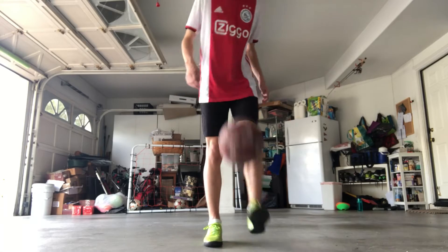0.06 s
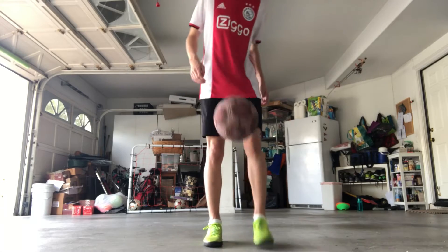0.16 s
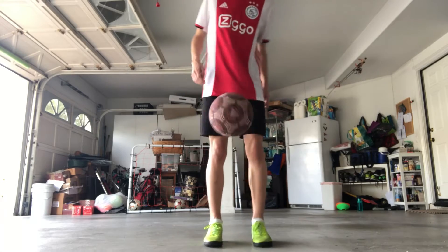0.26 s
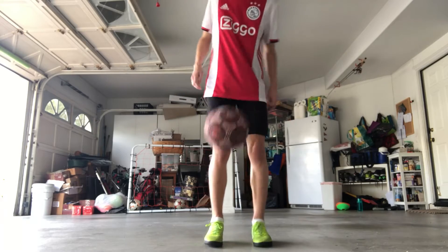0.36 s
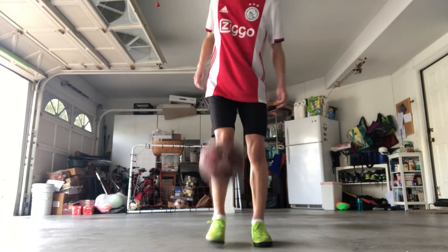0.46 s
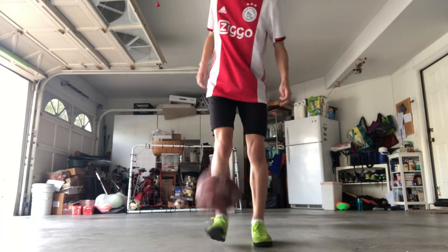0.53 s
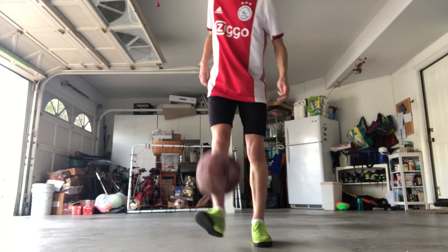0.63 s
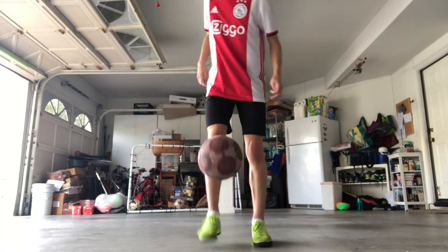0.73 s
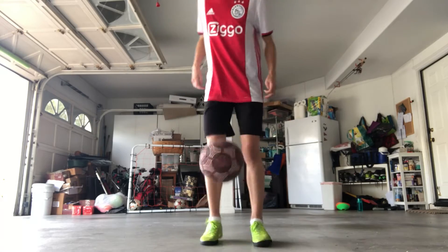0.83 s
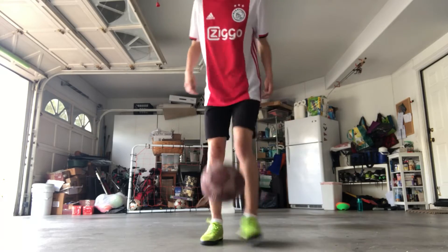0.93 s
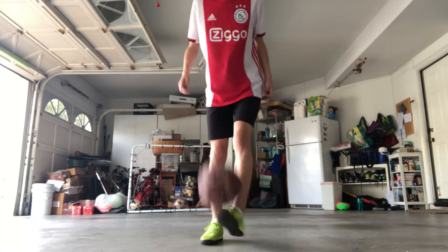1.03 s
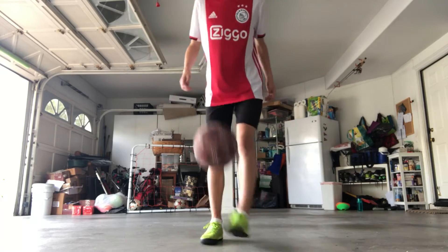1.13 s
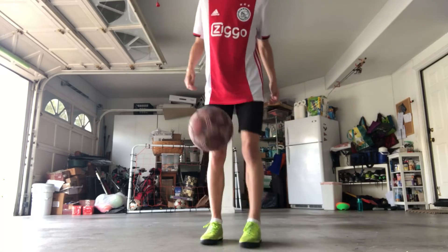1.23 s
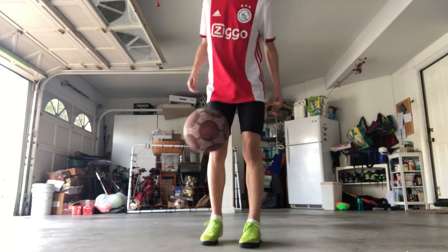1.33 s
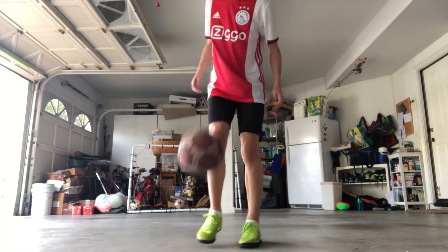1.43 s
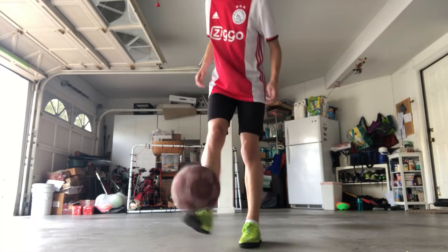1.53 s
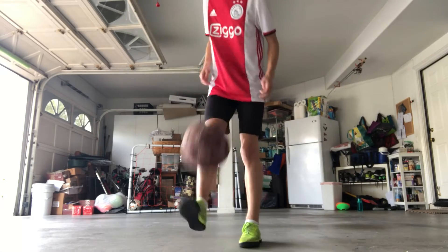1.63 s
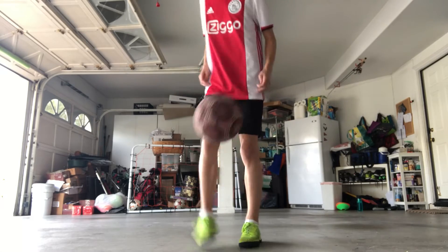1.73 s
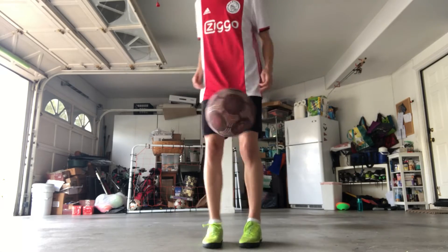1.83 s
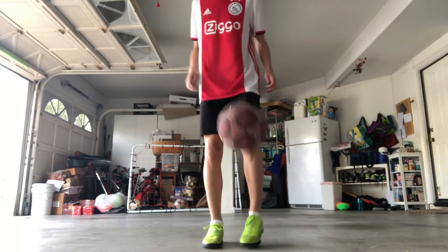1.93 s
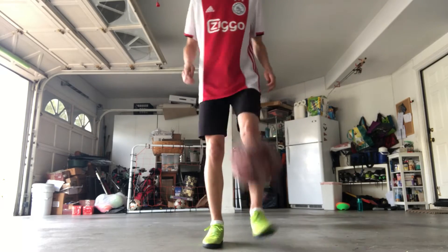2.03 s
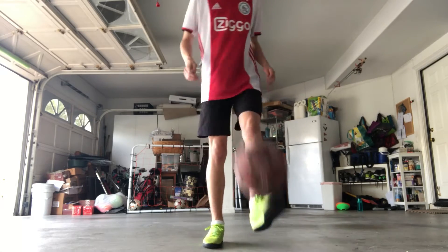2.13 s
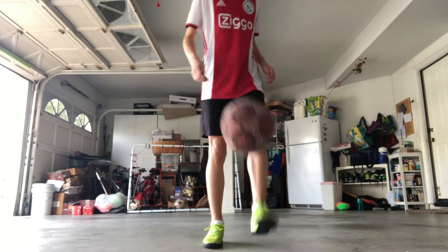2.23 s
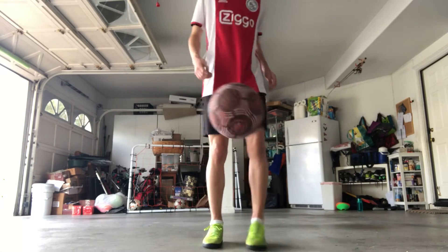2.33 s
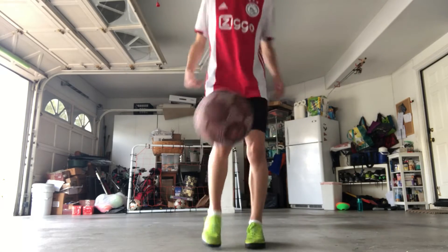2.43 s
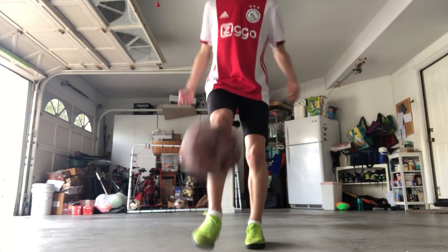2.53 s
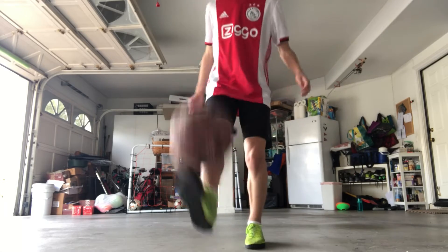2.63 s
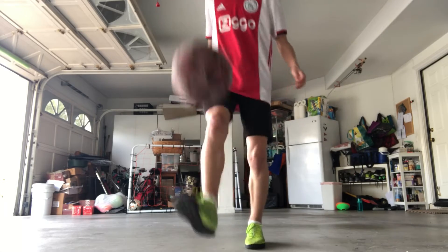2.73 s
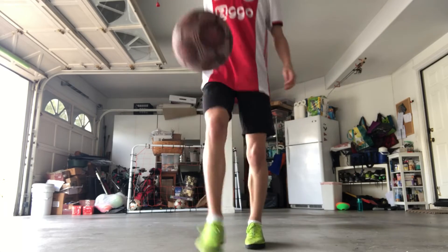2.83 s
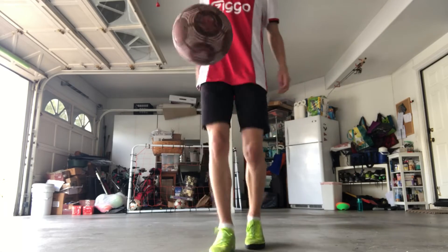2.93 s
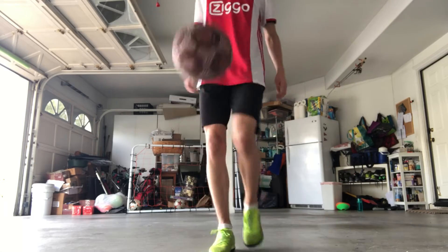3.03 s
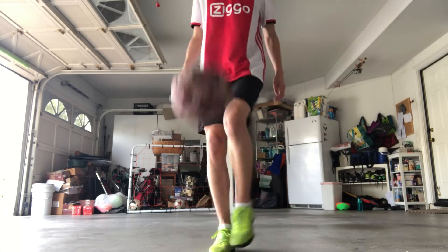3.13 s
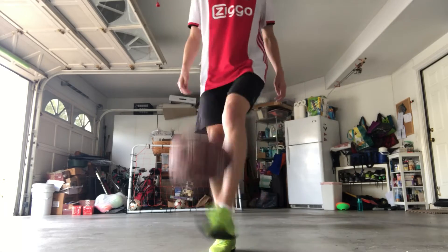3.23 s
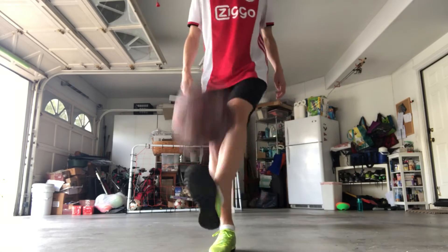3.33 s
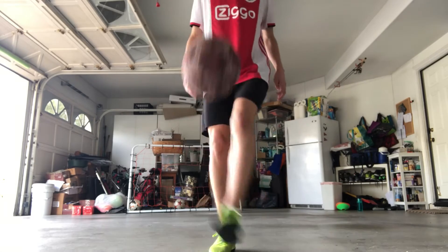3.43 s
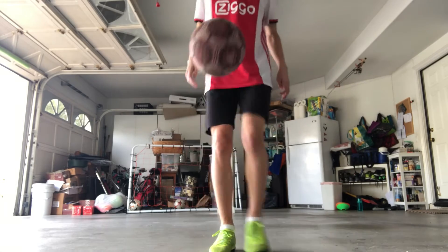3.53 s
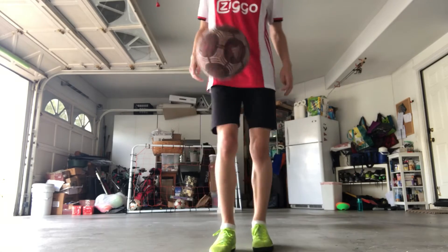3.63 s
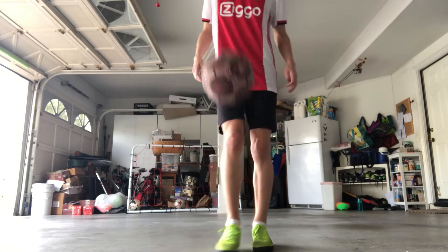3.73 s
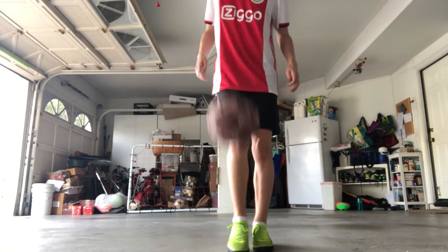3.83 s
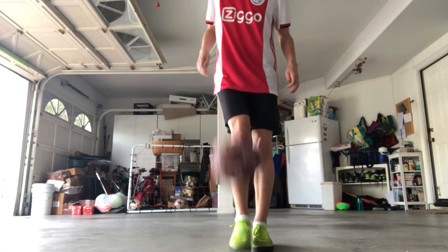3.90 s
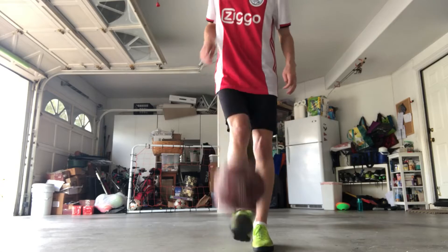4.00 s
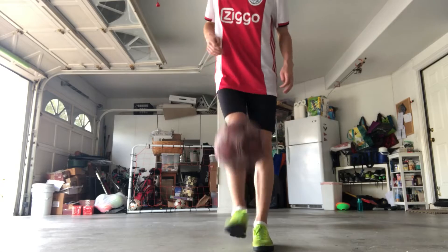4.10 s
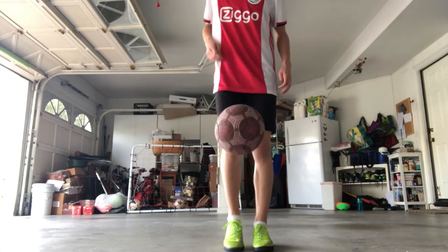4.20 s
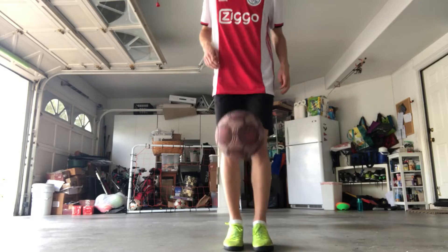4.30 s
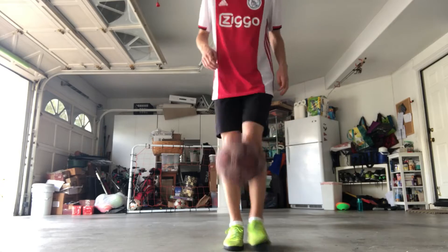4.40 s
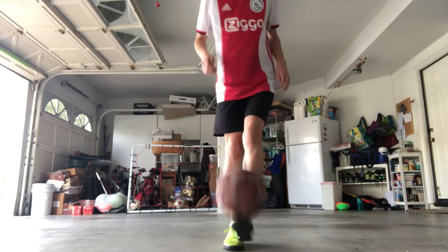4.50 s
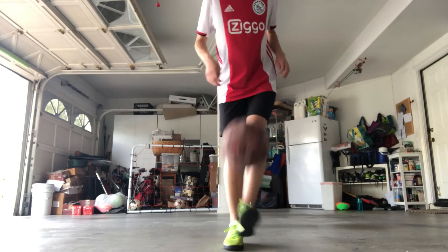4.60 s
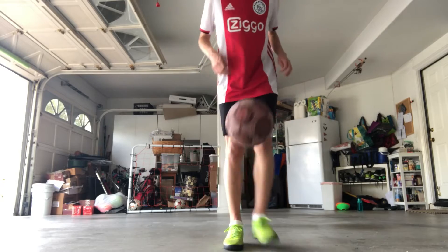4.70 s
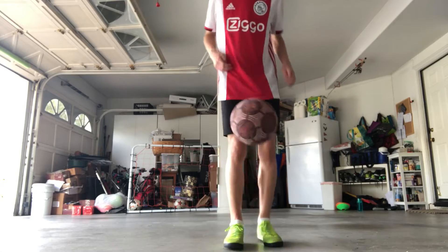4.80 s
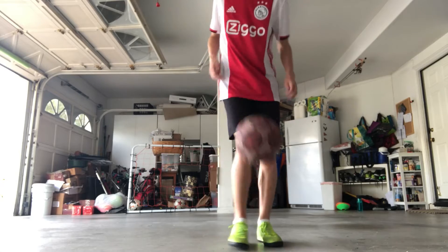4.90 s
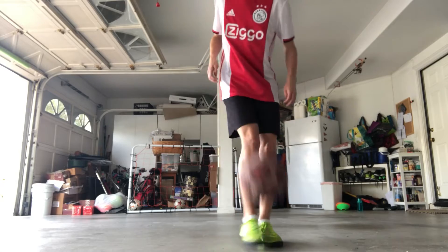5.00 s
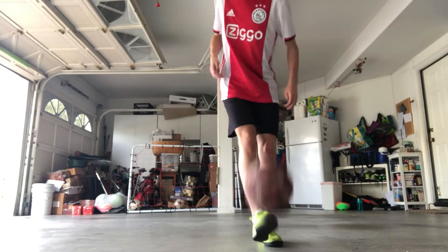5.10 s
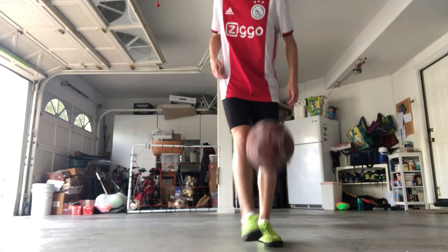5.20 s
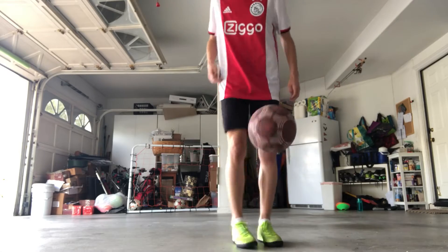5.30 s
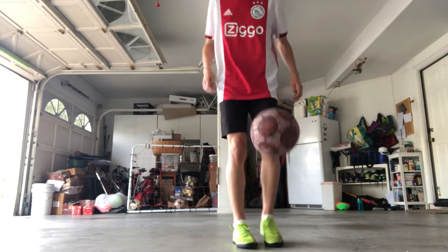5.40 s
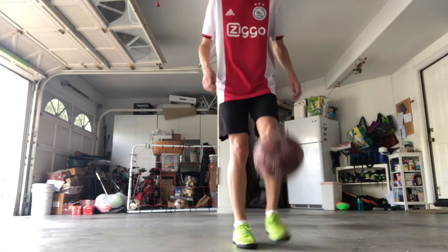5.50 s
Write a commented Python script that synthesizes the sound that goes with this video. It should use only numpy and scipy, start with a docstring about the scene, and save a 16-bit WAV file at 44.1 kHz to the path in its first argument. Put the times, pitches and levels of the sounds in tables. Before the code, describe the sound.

A soccer ball is juggled in a bare garage, with hollow thumps alternating with sharp shoe slaps and gritty scuffs on concrete.

```python
"""Juggling a ball in a garage

A player juggles a soccer ball close to a phone on the concrete floor. Each kick is a push-pull thump with damped
casing and air modes and a leather crack; between kicks the shoe slaps down and its sole scuffs on grit as shaped noise.
Bare walls add echoes and a diffuse tail of about half a second; a motor hums and whines faintly over filtered hiss."""
import sys
import numpy as np
from scipy.fft import rfft, irfft, next_fast_len
from scipy.io import wavfile
from scipy.ndimage import uniform_filter1d, map_coordinates

SR = 44100
rng = np.random.default_rng(int(sys.argv[2]) if len(sys.argv) > 2 else 0)


def dump_mix(stems):
    """Bounce the given channels to the path in sys.argv[1] as a 16-bit WAV at rate SR."""
    frames = np.atleast_2d(stems).T  # one column per channel
    limited = np.clip(frames, -1, 1)  # hard clip at full scale
    pcm = np.round(limited * 32767).astype(np.int16)
    wavfile.write(sys.argv[1], SR, pcm)


N = 244733
LEAD = 4410  # samples ahead of time zero, for the kick that starts there


def amp(db):
    """Amplitude ratio of a level in dB."""
    return 10 ** (np.asarray(db) / 20)


def unit(x):
    """x scaled to an RMS of 1."""
    return x / np.sqrt(np.mean(x ** 2) + 1e-20)


def filtered(x, response):
    """x times a complex response of frequency."""
    m = next_fast_len(len(x) + SR // 4)
    freq_hz = np.fft.rfftfreq(m, 1 / SR) + 1  # +1 keeps logs and divisions finite
    return irfft(rfft(x, m) * response(freq_hz), m)[:len(x)]


def random_curve(knots_per_s):
    """A smooth random curve of about unit spread: a spline through normal draws."""
    knots = rng.standard_normal(int(N * knots_per_s / SR) + 4)
    return map_coordinates(knots, [np.arange(N) * knots_per_s / SR])


def bell(f, centre_oct, width_oct):
    """A Gaussian over pitch, in octaves above 1 kHz, with a least width of 0.2 octave."""
    return np.exp(-.5 * ((np.log2(f / 1000) - centre_oct) / max(width_oct, .2)) ** 2)


def blurred(spectrum, octaves):
    """Magnitude of a spectrum, its power averaged over a span of pitch."""
    bins_per_oct = 48
    pitch = np.log2(np.arange(len(spectrum)) + 1)
    grid = np.arange(0, pitch[-1], 1 / bins_per_oct)
    power = np.interp(grid, pitch, np.abs(spectrum) ** 2)
    power = uniform_filter1d(power, size=max(round(bins_per_oct * octaves), 1))
    return np.sqrt(np.abs(np.interp(pitch, grid, power)))


def ringing(modes, t, pitch_hz=1):
    """Exponentially damped modes, struck at new strengths each time (1 dB spread)."""
    total = 0
    for multiple, db, t60_s in modes:
        envelope = amp(db + rng.normal(0, 1) - 60 * t / t60_s)
        total = total + envelope * np.cos(2 * np.pi * multiple * pitch_hz * t)
    return total


def crack(t, ping_db, ping_hz, burst_db, t60_s, centre_oct, width_oct, air_db):
    """A short ping at one pitch inside a burst of treble noise with an airy top."""
    ping = np.sin(2 * np.pi * ping_hz * t) * amp(-60 * t / 0.007)
    burst = rng.standard_normal(len(t)) * amp(-60 * t / t60_s) * (1 - np.exp(-t / 0.00068))
    burst *= 5 / np.linalg.norm(burst)  # equal energy each time, before the filter

    def colour(f):
        return bell(f, centre_oct, width_oct) + amp(air_db) * bell(f, 3.35, 0.51)

    return amp(ping_db) * ping + amp(burst_db) * filtered(burst, colour)


def diffuse_tail(t):
    """Late reverberation: noise split into overlapping bands, each dying at its own speed."""
    # Garage tail bands: (centre [Hz], t60 [s], relative energy [dB])
    tail_bands = [(64, 0.3, 4.5), (133, 0.47, -7), (260, 0.34, 8), (648, 0.5, -1.5), (1340, 0.57, 1.5),
                  (2140, 0.52, 8), (4660, 0.55, 1.5), (7900, 0.41, -0.5), (10600, 0.42, -1.5),
                  (14500, 0.4, -2.5)]
    hz, t60_s, db = np.transpose(tail_bands)
    noise = rfft(rng.standard_normal(len(t)))
    log_f = np.log(np.fft.rfftfreq(len(t), 1 / SR) + 1)
    shares = np.array([np.interp(log_f, np.log(hz), row) for row in np.eye(len(hz))])
    decay = amp(db[:, None] - 60 * t / t60_s[:, None])
    decay /= np.sqrt(t60_s[:, None] * SR / np.log(1e6))  # dB sets energy, whatever the t60
    onset = 1 - np.exp(-(t / 0.00079) ** 2)
    return (irfft(noise * shares, len(t)) * decay).sum(0) * onset


def add(out, start_s, sound, room_db=0, blow=True):
    """Places a sound with first echoes off the walls and a fresh diffuse tail."""
    # First wall echoes: (nominal delay [ms], level before room_db [dB])
    first_echoes = [(4.5, -7.5), (7, -36), (10.5, -10), (13, -16.5), (18, -36), (25, -39)]
    t = np.arange(SR * 3 // 4) / SR
    tail = diffuse_tail(t)
    echoes = np.zeros(len(t))
    for ms, echo_db in first_echoes:
        echoes[int(ms * rng.uniform(.9, 1.1) * SR / 1000)] = amp(echo_db + room_db)
    echoes[0] = 1  # direct sound
    m = next_fast_len(SR)
    direct = rfft(sound, m)
    # walls hear a blow from all sides, which evens out its spectral peaks
    radiated = blurred(direct, 0.58) if blow else direct
    early = direct * rfft(echoes, m)
    late = amp(room_db) * radiated * rfft(tail, m)
    heard = irfft(early + late, m)[:len(t)]
    at = LEAD + round(start_s * SR)
    out[at:at + len(heard)] += heard[:len(out) - at]


def ball(out):
    """The ball is squeezed and let go: a push, then a pull as it leaves the foot, ringing casing and air."""
    # Kicks: (time [s], thump level [dB], contact [ms], casing pitch [Hz], casing knock [dB re thump],
    #   air ring [dB re thump], leather crack [dB re thump], airy top [dB re crack])
    kicks = [(-.055, -17, 7.5, 555, 4.5, 6, -2, -17), (0.5568, -18, 4.3, 920, -4, -5, -6, -16),
             (0.9998, -24.5, 6.1, 735, 2.5, 9, -2.5, -4), (1.5428, -20.5, 6.44, 710, -0.5, 1, -3, -5),
             (2.0962, -19.5, 6.97, 700, 1, 6, -3, -3), (2.6012, -14, 7.33, 478, 2.5, 2, 1.5, -9),
             (3.2702, -12, 6.7, 725, 2, 5, -2.5, -11.5), (3.9733, -12.5, 4.03, 430, -2, 1.5, -5.5, -18),
             (4.4959, -20, 6.9, 570, 3.5, 6.5, -1.5, -14), (5.0685, -19.5, 5.44, 816, -23, 5.5, -4, -13)]
    # Air modes of the sphere: (frequency [Hz], level [dB], t60 [s])
    air_modes = [(1036, -4, 0.021), (1490, -10, 0.014), (2250, -13.5, 0.0089)]
    # Panel under the foot: (multiple of casing pitch [ratio], level [dB], t60 [s])
    casing_modes = [(1, 8.5, 0.0094)]
    # Whole ball wobbling out of round: (frequency [Hz], level [dB], t60 [s])
    shape_modes = [(264, 4, 0.059)]
    shape_db, ping_db, mid_ping_hz, room_db = -10, -12, 6300, -7  # shape re thump, ping re crack
    t = np.arange(SR // 10) / SR
    touch = 1 - np.exp(-(t / 0.00041) ** 2)  # the leather yields, so nothing starts with a step
    for start_s, db, contact_ms, casing_hz, knock_db, ring_db, crack_db, air_db in kicks:
        u = t * 1000 / contact_ms
        release = np.cos(np.pi / 2 * np.clip((u - 1) / 0.19, 0, 1)) ** 2
        thump = np.cos(np.pi * np.minimum(u, 1)) * release
        knock = amp(knock_db) * ringing(casing_modes, t, casing_hz)
        air_ring = amp(ring_db) * ringing(air_modes, t)
        out_of_round = amp(shape_db) * ringing(shape_modes, t)
        add(out, start_s, amp(db) * touch * (thump + knock + air_ring + out_of_round), room_db)
        # the crack is heard just after the thump starts
        ping_hz = mid_ping_hz * rng.uniform(0.91, 1.176)
        leather = crack(t, ping_db, ping_hz, 0, 0.011, centre_oct=2.265, width_oct=0.77, air_db=air_db)
        add(out, start_s + 0.00072, amp(db + crack_db) * leather, room_db + 1.5)


def background():
    """A motor hum of wandering sines, a thin whine that comes and goes, and gently fluctuating hiss."""
    # Motor hum gain: (time [s], level [dB])
    hum_level = [(0, -76), (2.6, -68), (3.05, -59.5), (4.0, -59), (4.6, -64.5), (5.4, -60.5), (5.55, -67)]
    # Motor lines: (frequency [Hz], mean level re hum gain [dB], width of pitch wander [Hz])
    motor_lines = [(97, -4.5, 3.33), (316, -17, 25.5)]
    # Whine gain, 2 dB above its mean level: (time [s], level [dB])
    whine_level = [(0, -71), (1.2, -71), (1.5, -66), (2.05, -65), (3.1, -74), (4.6, -74), (5.35, -64),
                   (5.55, -64)]
    # Hiss spectrum, overall level set below: (frequency [Hz], relative density [dB per Hz])
    hiss_spectrum = [(30, 7), (65, 7), (120, 5), (250, 6.5), (500, -0.5), (1000, -1), (1400, -5.5),
                     (4000, -13.5), (7500, -20), (9000, -18), (12000, -24), (16000, -23)]
    t = np.arange(N) / SR

    def line(hz, width_hz):
        wandering_hz = hz + .5 * width_hz * random_curve(10)
        return np.sqrt(2) * np.sin(2 * np.pi * np.cumsum(wandering_hz) / SR)

    def gain(rows):
        return amp(np.interp(t, *np.transpose(rows)))

    motor = sum(amp(db + 2 * random_curve(8)) * line(hz, width_hz) for hz, db, width_hz in motor_lines)
    whine = amp(3 * random_curve(9) - 2) * line(755, 16)
    hz, db = np.transpose(hiss_spectrum)
    noise = rng.standard_normal(N)
    hiss = unit(filtered(noise, lambda f: amp(np.interp(np.log(f), np.log(hz), db))))
    hiss_gain = amp(-57.5 + 2.4 * random_curve(3.3))
    return gain(hum_level) * motor + gain(whine_level) * whine + hiss_gain * hiss


def slaps(out):
    """The sole traps air as it lands: a short damped tone, with a click and a stud ping."""
    # Landings: (time [s], slap level [dB], click [dB re slap], stud ping [dB re slap], ping pitch [Hz])
    landings = [(0.1944, -4, -12.5, -15, 4420), (0.774, -10, -7, -34, 4200),
                (1.209, -6, -18.5, -11.5, 3730), (1.765, -14.5, -21, -39, 6000),
                (2.332, -15.5, -16, -21, 3430), (2.868, -8.5, -21, -15.5, 6700),
                (2.954, -20, -16, -15.5, 2600), (3.55, -16.5, -14, -15.5, 6700),
                (4.198, -8, -12, -44, 6100), (4.7433, -14, -14.5, -27, 6750),
                (5.276, -14.5, -22, -21.5, 2930)]
    air_period_ms = 1.72
    t = np.arange(SR // 6) / SR
    onset = 1 - np.exp(-(t / 0.00026) ** 2)
    slap = np.cos(2 * np.pi * t * 1000 / air_period_ms) * amp(-60 * t / 0.0047) * onset
    for start_s, db, click_db, ping_db, ping_hz in landings:
        room_db = -4.5 - 0.126 * db  # soft landings sound wetter
        add(out, start_s, amp(db) * slap, room_db)
        click = crack(t, ping_db, ping_hz, click_db, 0.0093, centre_oct=2.0, width_oct=0.89, air_db=-22.5)
        add(out, start_s, amp(db) * click, room_db - 1)


def scuffs(out):
    """The sole drags over grit: grainy, clumped noise whose band falls in pitch until its peak."""
    # Slides: (start [s], time to peak [s], level [dB], centre at the peak [octaves above 1 kHz],
    #   width [octaves], fall in pitch until the peak [octaves])
    slides = [(0.195, 0.029, -42, 1.2, 0.44, .5), (0.492, 0.0038, -60.5, 1.86, .3, .5),
              (.778, 0.025, -41, 1.73, 0.62, 0.46), (1.209, 0.025, -49.5, 1.86, 0.95, .3),
              (1.769, 0.021, -54.5, 2.16, 0.93, 0.61), (2.335, 0.021, -43.5, 2.02, 0.37, 1.35),
              (2.369, 0.0065, -43.5, 0.7, 1, .4), (2.868, 0.021, -42, 2.48, 0.67, 0.8),
              (3.552, 0.025, -41, 2.22, 0.39, 2), (3.611, 0.0023, -40, 1.1, 0.9, .3),
              (4.197, 0.027, -47, 2.14, 0.5, 0.81), (4.746, 0.021, -48.5, 2.13, 0.62, 0.71),
              (4.781, 0.0086, -42, 2.01, 1, 0.68), (5.28, 0.025, -58, 2.05, 0.98, .6)]
    rasp_db, fizz_db = -11, -17  # low rasp and airy fizz with every slide
    t = np.arange(SR // 6) / SR
    for start_s, rise_s, db, centre_oct, width_oct, fall_oct in slides:
        u = t / max(rise_s, .002)
        grains = unit(uniform_filter1d(rng.standard_normal(len(t)), size=30))
        clumps = unit(uniform_filter1d(rng.standard_normal(len(t)), size=260))
        grit = rng.standard_normal(len(t)) * amp(3.5 * grains + 2.5 * clumps)

        def scrape(at_oct):
            def colour(f):
                rasp = amp(rasp_db) * bell(f, 0.31, 0.75)
                fizz = amp(fizz_db) * bell(f, 3.1, 0.38)
                return bell(f, at_oct, width_oct) + rasp + fizz
            return unit(filtered(grit, colour))

        sliding = 0
        for k in range(3):  # crossfade through three pitches, high to low
            share = np.clip(1 - abs(2 * np.minimum(u, 1) - k), 0, 1)
            sliding = sliding + np.sqrt(share) * scrape(centre_oct + fall_oct * (1 - k / 2))
        swell = (u * np.exp(1 - u)) ** 1.76
        add(out, start_s, amp(db) * sliding * swell, -3, blow=False)


def scene():
    """Ball and shoes in the room, over the background."""
    out = np.zeros(N + LEAD)
    ball(out)
    slaps(out)
    scuffs(out)
    return (out[LEAD:] + background())[None]


def record(dry, turns=1.46, bass_hz=55, step_hz=8300, step_db=-7, top_hz=16600):
    """The phone cuts bass and top, hears less above its port's peak and delays lows more: hits fall in pitch."""
    def lag(f):  # nearly the same number of cycles at each frequency
        return np.exp(-2j * np.pi * turns * np.log((f + 20) / 8000))

    def bass_cut(f):
        return 1 / np.sqrt(1 + (bass_hz / f) ** 11)

    def port(f):
        return amp(step_db / (1 + (step_hz / f) ** 30))

    return filtered(dry[0], lambda f: lag(f) * bass_cut(f) * port(f) * (f < top_hz))[None]


dry = scene()
out = record(dry)
dump_mix(out)
```